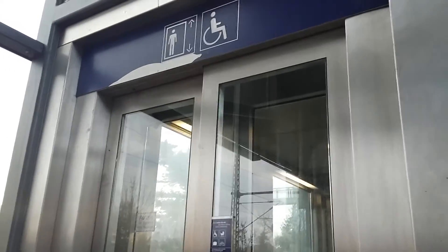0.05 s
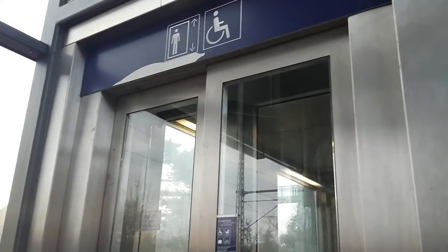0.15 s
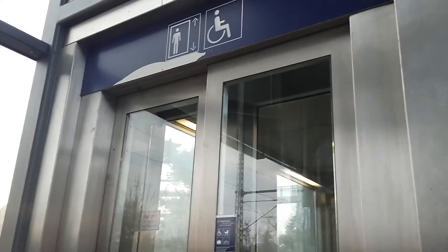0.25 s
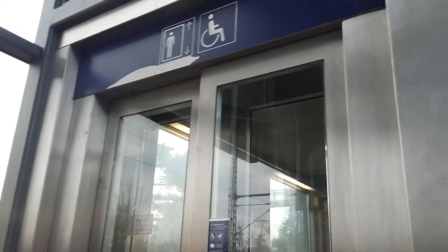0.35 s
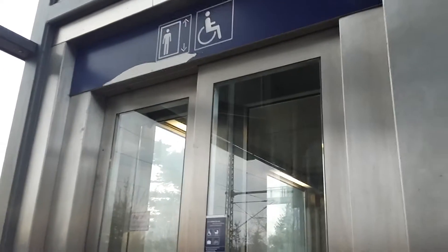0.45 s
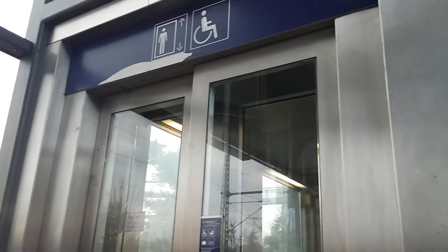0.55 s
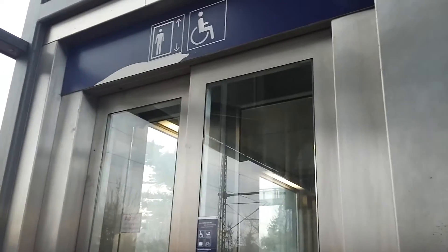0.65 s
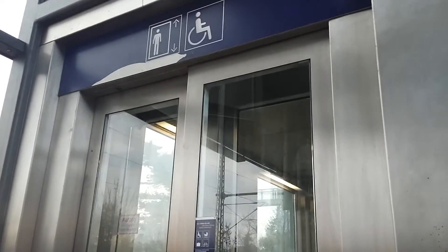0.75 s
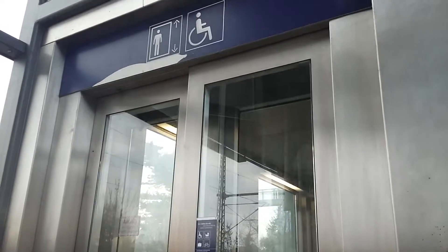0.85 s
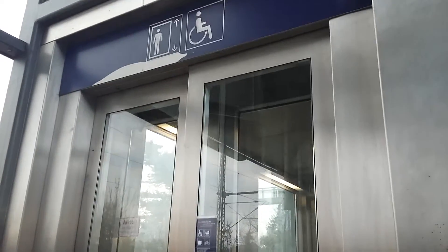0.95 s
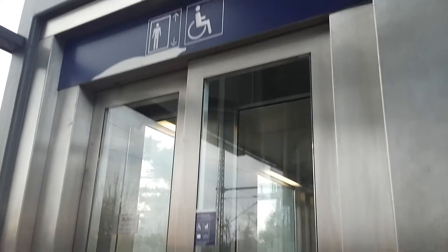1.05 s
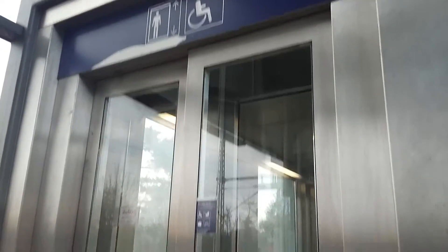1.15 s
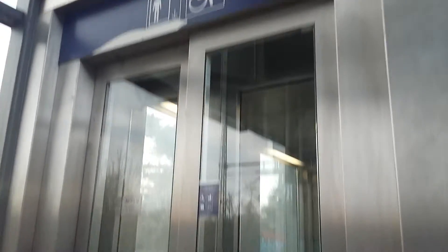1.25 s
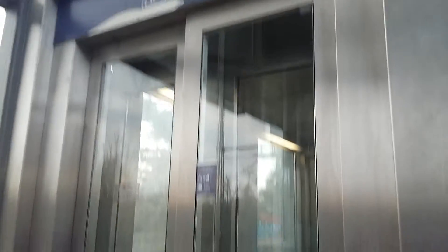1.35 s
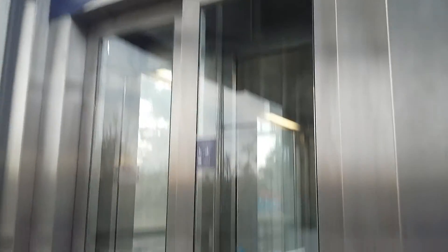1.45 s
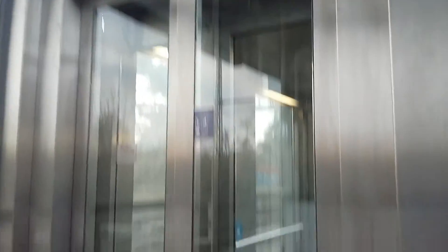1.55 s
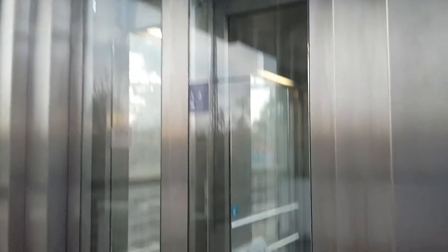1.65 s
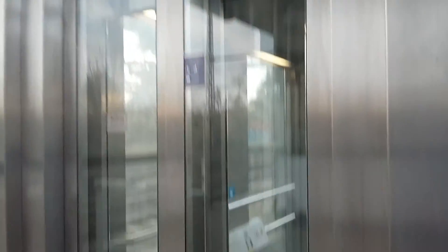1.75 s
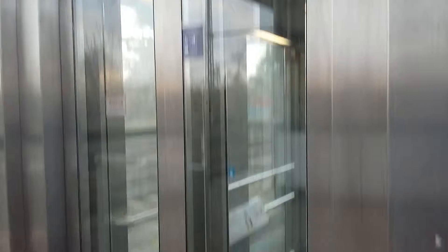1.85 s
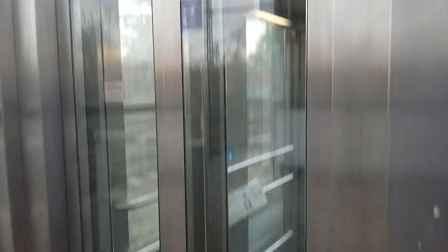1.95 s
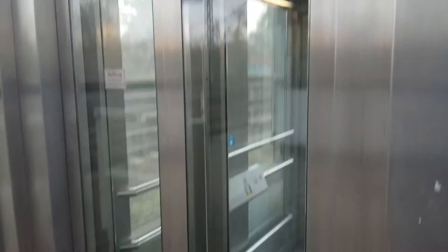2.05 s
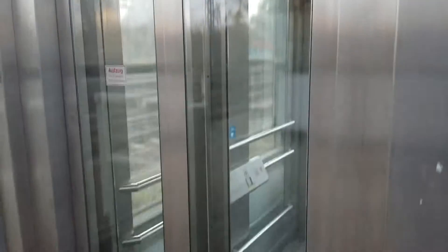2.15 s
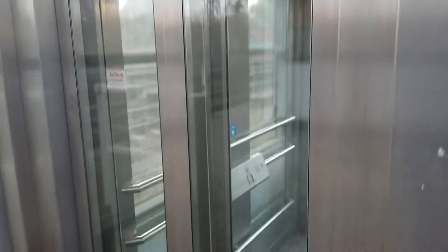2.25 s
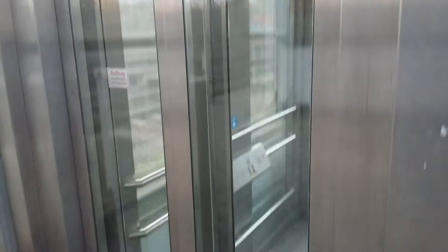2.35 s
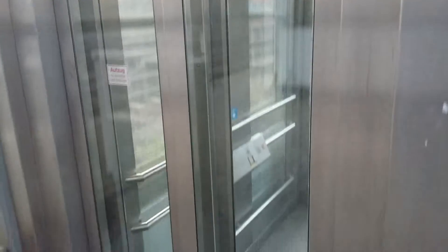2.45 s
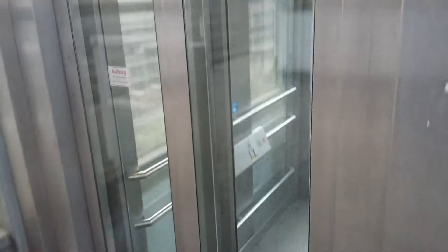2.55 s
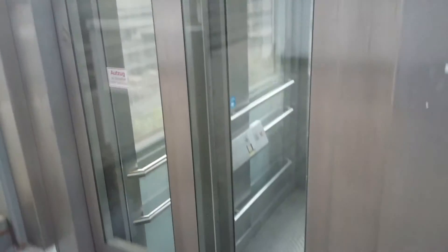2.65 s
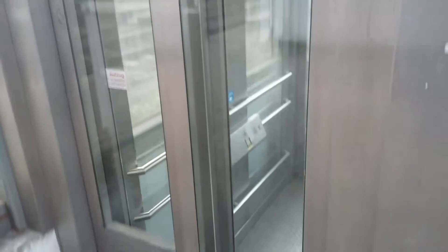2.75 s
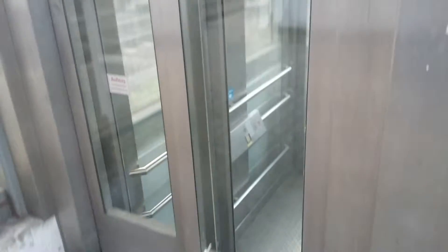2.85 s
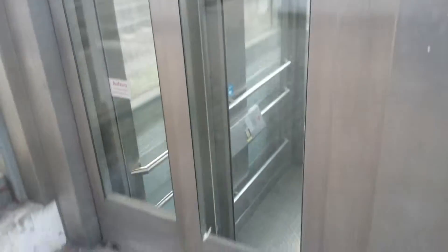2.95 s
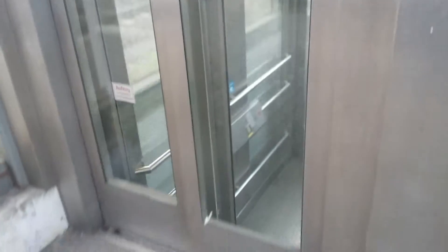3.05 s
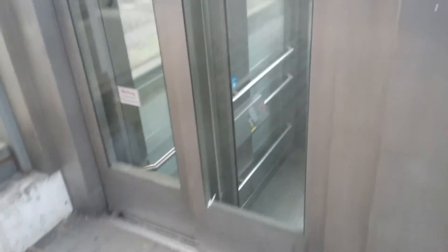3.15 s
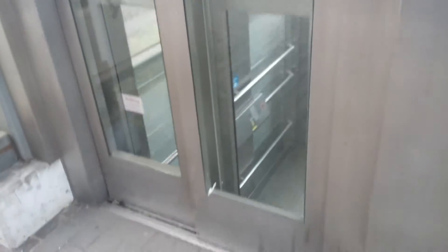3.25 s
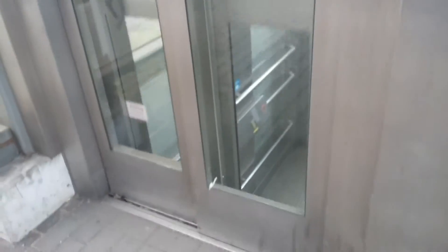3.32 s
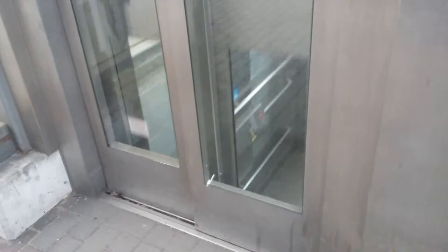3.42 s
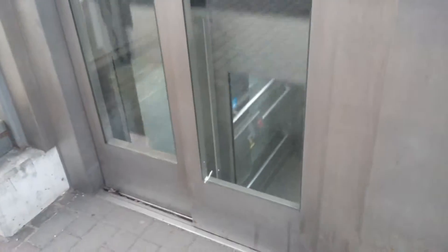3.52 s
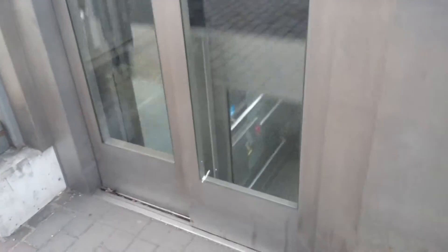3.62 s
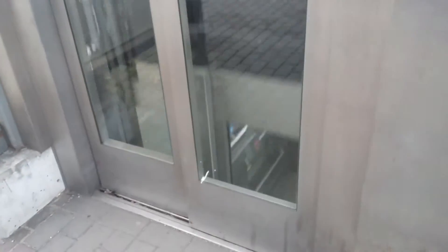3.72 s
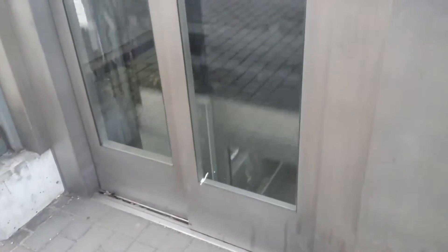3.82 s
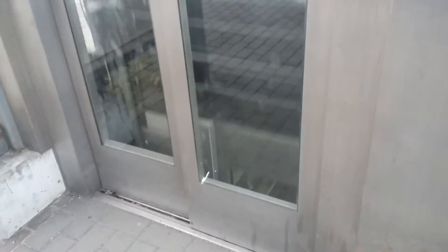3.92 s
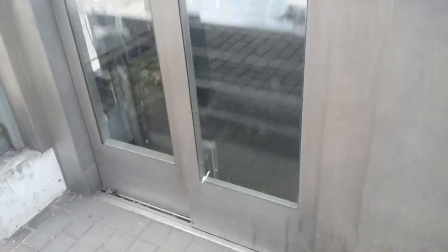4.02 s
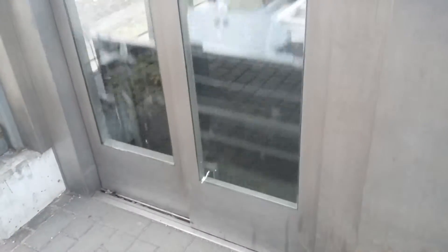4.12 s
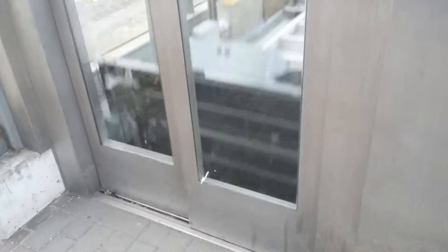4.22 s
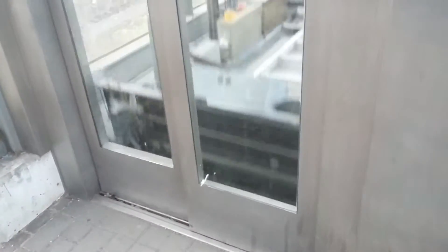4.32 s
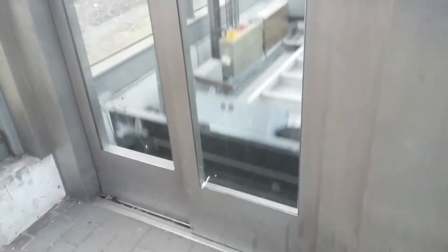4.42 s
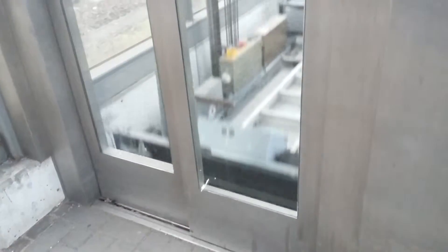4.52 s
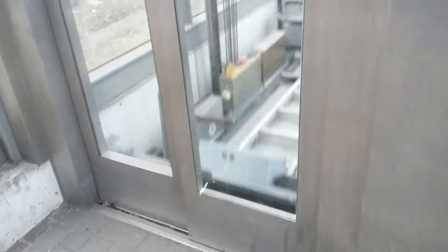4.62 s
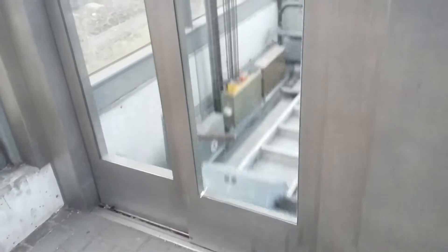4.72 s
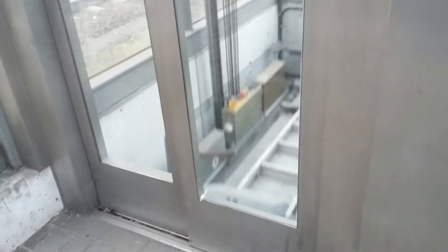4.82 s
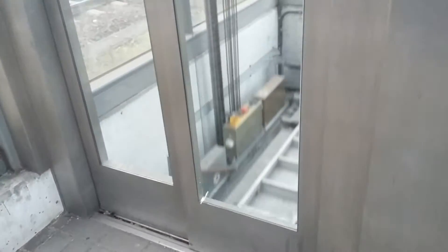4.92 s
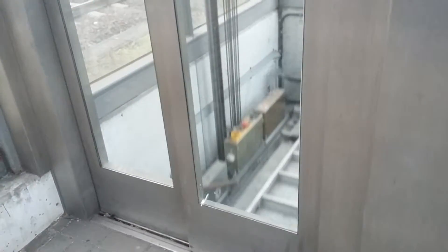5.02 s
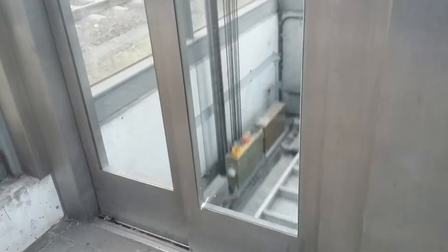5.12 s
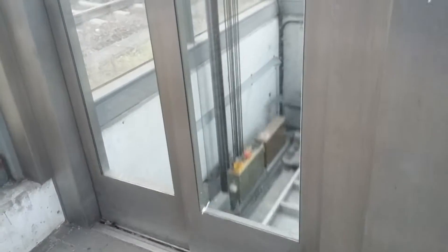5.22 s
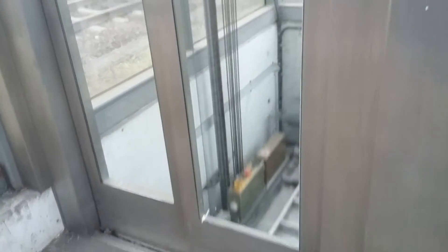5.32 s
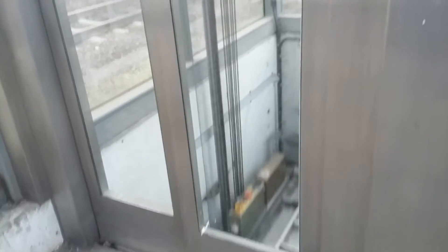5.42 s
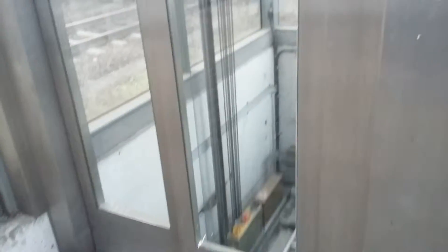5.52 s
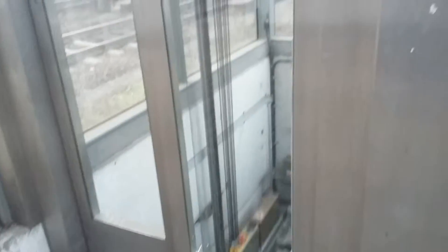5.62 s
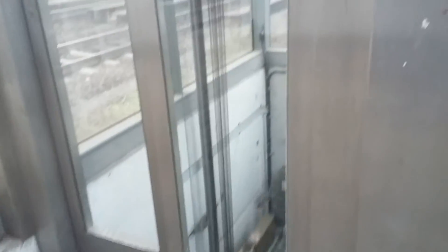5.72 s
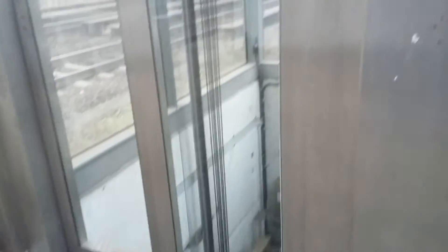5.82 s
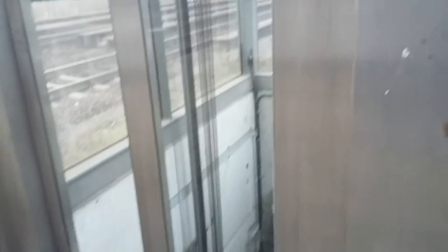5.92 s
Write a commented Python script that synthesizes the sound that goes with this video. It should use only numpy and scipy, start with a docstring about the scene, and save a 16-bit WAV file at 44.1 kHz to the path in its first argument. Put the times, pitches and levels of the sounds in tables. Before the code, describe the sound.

A lift drive groans upward in pitch through a booming shaft, a hard metallic clunk rattles the doors, then a low beating hum carries on.

```python
"""Lift shaft on a railway platform

Outdoors beside a glass lift shaft, which stands a little to the right of a two-port microphone.
The drive's sine orders run up through the booming resonances of the shaft, a latch clunks as ringing
modes while the car passes the landing, and the car travels down on beating low orders and a mains hum.
Thin whines and tiny ticks lie on top; behind are the town, as shaped noise, wind at the ports and hiss.
"""
import sys
import numpy as np
from scipy import signal
from scipy.fft import rfft, irfft, next_fast_len
from scipy.io import wavfile
from scipy.ndimage import uniform_filter1d

SR = 44100
rng = np.random.default_rng(int(sys.argv[2]) if len(sys.argv) > 2 else 0)


def to_wav(sig):
    """Store sig (one row per channel, or 1-D mono) as 16-bit WAV at the path in sys.argv[1].

    Samples outside -1..1 are clipped; the rate is SR.
    """
    pcm = np.clip(np.atleast_2d(sig), -1, 1) * 32767
    pcm = np.round(pcm).astype(np.int16)
    wavfile.write(sys.argv[1], SR, pcm.T)  # frames by channels


N = 263497
T = np.arange(N) / SR


def gain_of(db):
    """Decibels to gain."""
    return 10 ** (np.asarray(db) / 20)


def evened(x):
    """Scaled to rms 1."""
    return x / np.sqrt(np.mean(x ** 2) + 1e-20)


def read(points, hz):
    """A table over frequency, read on a log-frequency axis."""
    f, value = np.transpose(points)
    return np.interp(np.log(hz + 1), np.log(f + 1), value)


def fade(on, off, edge_s):
    """Silent, then held from on to off with straight edges."""
    return np.clip(np.minimum(T - on, off - T) / edge_s, 0, 1)


def curves(rows):
    """Columns over time, and a gate that fades in and out at the ends of the table."""
    s, *columns = np.transpose(rows)
    return fade(s[0], s[-1], .04), [np.interp(T, s, c) for c in columns]


def swell(middle, half):
    """A bell-shaped rise and fall."""
    return np.exp(-((T - middle) / half) ** 2)


def slow(count, span_s):
    """Rows of slow chance, rms 1."""
    size = max(round(span_s * SR), 2)
    chance = rng.standard_normal((N, count)).T
    return evened(uniform_filter1d(uniform_filter1d(chance, size), size))


def tone(hz, db):
    """A sine that follows pitch and rms level curves."""
    return np.sqrt(2) * gain_of(db) * np.sin(2 * np.pi * np.cumsum(hz) / SR)


def resonate(x, hz, width):
    """One resonance of gain 1 at its centre."""
    pole = np.exp((2j * np.pi * hz - np.pi * width) / SR)
    return 2 * signal.lfilter([1 - abs(pole)], [1, -pole], x).real


def clicks(rows):
    """One impulse for each row of start in seconds and level in dB."""
    train = np.zeros(N)
    for s, db in rows:
        train[round(s * SR)] = gain_of(db)
    return train


# Likeness of left and right noise. Each row: frequency in Hz, correlation from -1 to 1.
LIKENESS = [(60, 1), (150, 0.92), (360, 0.95), (870, 0.41), (2130, -0.12), (5190, 0.037)]
# Balance of the noise. Each row: frequency in Hz, left minus right in dB.
BALANCE = [(60, 0), (150, -0.5), (360, -0.5), (870, -0.5), (2130, -3), (5190, 3.5)]


def noise_pair(size, shape_db):
    """Two channels of random short-time spectra; shape_db(hz, t) gives the field of levels."""
    hop = size // 4
    hz = np.fft.rfftfreq(size, 1 / SR)
    t = np.arange(N // hop + 5) * hop / SR
    a, b, c, d = rng.standard_normal((len(t), len(hz), 4)).T
    same = np.clip(read(LIKENESS, hz), -1, 1)[:, None]
    left = a + 1j * b
    right = same * left + np.sqrt(1 - same ** 2) * (c + 1j * d)
    lean_db = read(BALANCE, hz)[:, None] * np.array([.5, -.5])[:, None, None]
    spectra = np.array([left, right]) * gain_of(shape_db(hz[:, None], t) + lean_db)
    return signal.istft(spectra, nperseg=size, noverlap=size - hop)[1][:, :N]


# Air and glass of the shaft. Each row: frequency in Hz, width of the first pass in Hz, level in dB.
SHAFT = [(115.7, 10, 0.5), (184.8, 9.8, -15), (211.3, 15.8, -9.5), (222, 14, -18)]


def shaft(x):
    """The shaft passes on only what meets its resonances."""
    return sum(gain_of(db) * resonate(resonate(x, hz, width), hz, 2 * width) for hz, width, db in SHAFT)


# Drive wheel speeding up, then steady. Each row: time in seconds, turns a second.
WHEEL = [(1.6, 2.77), (1.9, 3.8), (2.2, 4.87), (2.5, 6), (2.8, 6.97), (3.25, 8.33), (3.5, 9.47),
         (3.7, 9.85), (3.87, 10.2), (4.1, 10.26)]
# Orders heard in the run-up, in cycles per turn; their levels in dB; their start and end in seconds.
RUN_UP_ORDERS = (30, 22, 11)
RUN_UP_DB = [-41, -40, -38]
RUN_UP_S = (1.7, 3.25)
RUN_UP_WAVER_DB = 2.5  # chance swing of level, rms
# How well the structure carries each pitch. Each row: frequency in Hz, level in dB.
CARRY = [(55, -23.5), (67, -13.5), (83, -14), (100, -3.5), (109, -1), (118, 1.5), (125, 0.5), (132, -1.5),
         (140, -9), (148, -5), (168, -12), (180, -3.5), (190, 0.5), (197, -11), (205, 1), (210, -5.5),
         (217, 2.5), (224, -10), (232, -19), (240, -13), (250, -9)]
# Rumble that stirs the shaft. Each row: time in seconds, rms level in dB.
STIR = [(0, -39.5), (.9, -50.5), (1.4, -43), (2.3, -44), (2.8, -47.5), (3.15, -41), (3.6, -34.5),
        (4.5, -45.5), (5.3, -46), (5.97, -54)]
# Glass panes that ring on as an order crosses them.
# Each row: frequency in Hz, width of the first pass in Hz, level in dB.
PANES = [(207, 5, 7), (222, 5, 9)]
# the main boom of the shaft, which rings on after an order has crossed it
BOOM_HZ, BOOM_WIDTH_HZ, BOOM_DB = 117.5, 5.2, 15.5


def drive():
    """Three orders sweep upward and the shaft booms as they cross its resonance; rumble stirs it throughout."""
    turns = curves(WHEEL)[1][0]
    orders = 0
    for k, db, waver in zip(RUN_UP_ORDERS, RUN_UP_DB, slow(count=3, span_s=0.033)):
        hz = k * turns
        orders = orders + tone(hz, db + read(CARRY, hz) + RUN_UP_WAVER_DB * waver)
    orders = fade(*RUN_UP_S, 0.045) * orders
    boom = gain_of(BOOM_DB) * resonate(resonate(orders, BOOM_HZ, BOOM_WIDTH_HZ), BOOM_HZ, 45.0)
    rings = sum(gain_of(db) * resonate(resonate(orders, hz, width), hz, 4 * width) for hz, width, db in PANES)
    rumble = evened(shaft(rng.standard_normal(N))) * gain_of(curves(STIR)[1][0])
    return orders + boom + rings + rumble


# Orders of the travelling car, in cycles per turn of the wheel.
TRAVEL_ORDERS = (10, 11, 12, 22)
# Car travelling away. Each row: time in seconds, then the levels of orders 10, 11, 12 and 22 in dB.
TRAVEL_LEVEL = [(3.35, -44, -37, -41, -56), (3.48, -37, -42, -47, -43), (3.58, -34, -38.5, -32.5, -42),
                (3.68, -46, -29.5, -38, -50), (3.77, -46, -29, -47, -52), (3.86, -35.5, -33, -52, -46),
                (3.98, -35, -33, -45, -43.5), (4.08, -40, -36.5, -47, -43), (4.19, -45, -39, -43, -44),
                (4.31, -42, -30.5, -48, -48.5), (4.5, -38.5, -41, -46, -47.5), (4.62, -32, -35, -50, -46.5),
                (4.78, -40, -42, -43, -48), (4.9, -39, -32.5, -52, -58), (5.07, -36.5, -46.5, -54, -62),
                (5.26, -39.5, -50, -42, -57), (5.42, -44, -43, -42, -61), (5.6, -39, -45.5, -40, -65),
                (5.74, -39.5, -52, -41, -49), (5.86, -40, -43, -39, -58), (5.97, -52.5, -56, -49, -57)]
# Balance of those orders: left minus right in dB for each.
ORDER_LEAN_DB = [0, -4.5, -2, -1.5]
# At full speed the orders sit slightly off their exact pitch: offset in Hz for each.
SLIP_HZ = (.4, -.42, .6, -.6)
FULL_SPEED_S = 3.95
WAVER_DB, WAVER_S, WANDER_HZ = 1.2, .05, .12  # chance swing of level, its span, chance drift of pitch
IN_STEP_S = 4.61  # a moment when the orders swell together


def travel():
    """Neighbouring wheel orders beat against each other, each wandering a little in pitch and level."""
    turns = curves(WHEEL)[1][0]
    levels = np.array(curves(TRAVEL_LEVEL)[1]) + WAVER_DB * slow(count=4, span_s=WAVER_S)
    wander_hz = WANDER_HZ * slow(count=4, span_s=0.17)
    pitch_hz = np.outer(TRAVEL_ORDERS, turns) + np.outer(SLIP_HZ, T > FULL_SPEED_S)
    cycles = np.cumsum(pitch_hz + wander_hz, 1) / SR
    cycles = cycles - cycles[:, [round(IN_STEP_S * SR)]]
    orders = 0
    for c, db, lean_db in zip(cycles, levels, ORDER_LEAN_DB):
        sides_db = lean_db * np.array([[.5], [-.5]])
        orders = orders + np.sqrt(2) * np.cos(2 * np.pi * c) * gain_of(db + sides_db)
    return fade(TRAVEL_LEVEL[0][0], 7, 0.086) * orders


# Blows inside the clunk. Each row: start in seconds, level in dB relative to the others,
# place along the latch bar from 0 to 1, softness in ms.
BLOWS = [(3.2133, 8, 0.05, .15), (3.219, 6, 0.36, .05), (3.223, -1.5, 0.9, .06), (3.228, 7, .23, 0.065),
         (3.236, 0, .64, .08), (3.243, 3, .45, .09), (3.248, 2, .91, .09), (3.255, -3, 0.1, .09),
         (3.263, -6.5, 0.73, .09)]
# Modes of the latch. Each row: frequency in Hz, relative level in dB, time to fall 60 dB in seconds.
LATCH = [(366, -11.5, 0.44), (407, -16, 0.23), (437, -5, 0.25), (467, -17.5, 0.35), (524, -8, 0.44),
         (564, -11, 0.33), (617, -5, 0.14), (650, -14.5, 0.25), (691, -6, 0.21), (756, -7, 0.19),
         (802, -2, 0.13), (1006, -8, 0.17), (1155, -20.5, 0.67), (1360, -32, 0.24), (1430, -23, .28),
         (1430, -22, 0.3), (1584, -11, 0.2), (1630, -10, 0.13), (1880, -16, 0.14), (1920, -23, 0.28),
         (2096, -18, 0.2), (2950, -26, .15), (3340, -26, 0.11), (2148, -9.5, .16), (2180, -12, .18),
         (2420, -20, .14), (3080, -20, .08)]
# Colour of the door rattle. Each row: frequency in Hz, relative level in dB per Hz.
RATTLE = [(35, -42), (60, -11), (136, 7), (338, -15.5), (450, -5.5), (576, -18), (752, -10.5), (827, -14.5),
          (1250, -18.5), (1640, -16.5), (1770, -17.5), (2250, -25.5), (2550, -32.5), (3000, -31.5),
          (5640, -49.5), (7330, -61), (12400, -120)]
# Decay of the rattle. Each row: frequency in Hz, time to fall 60 dB in seconds.
RATTLE_T60 = [(100, 0.5), (170, 0.6), (300, 0.6), (500, 0.5), (1500, 0.45), (4000, 0.55), (8000, 1)]
# Onset of the rattle. Each row: frequency in Hz, seconds to full strength.
RATTLE_RISE_S = [(100, 0.017), (400, 0.013), (800, .002), (1600, 0.028), (2300, .006), (5000, .004)]
# Modes of the frame. Each row: frequency in Hz, delay after the first blow in seconds, level in dB,
# rise in seconds, time to fall 60 dB in seconds.
FRAME = [(59.7, .056, -19.5, 0.049, 1), (111.7, 0.036, -20.5, 0.026, 0.71), (134, 0.039, -22, 0.025, 0.84),
         (153.6, 0.064, -29.5, 0.055, 1), (167, 0.016, -27.5, 0.034, 0.79), (182, .02, -37.5, 0.027, 0.43),
         (213, 0.022, -36, 0.025, 0.61), (274.6, 0.0052, -26, 0.033, 0.48),
         (297, 0.015, -25.5, 0.039, 0.41), (440, .008, -24, .012, 0.27), (635, .015, -27, .012, .2),
         (767, .001, -22, 0.0083, .2), (1588, .006, -32.5, 0.0045, .25), (1657, .008, -37.5, 0.0057, 0.16)]


def clunk():
    """A cluster of blows rings the latch, sets the doors rattling and swells the frame."""
    t, latch = np.arange(SR) / SR, 0
    hz, db, t60 = np.transpose(LATCH)[:, :, None]
    modes = gain_of(db - 60 * t / t60) * np.sin(2 * np.pi * hz * t)
    for *blow, place, soft_ms in BLOWS:
        # where it lands decides how each mode is pushed
        spot = np.cos(np.pi * place * np.arange(len(LATCH)))
        # rubber buffers soften each blow
        pad = np.exp(-(np.arange(-40, 41) / (soft_ms * SR / 1000)) ** 2)
        padded = signal.oaconvolve(clicks([blow]), pad / pad.sum(), "same")
        latch = latch + gain_of(-33.0) * signal.oaconvolve(padded, spot @ modes)[:N]
    start = BLOWS[0][0]

    def rattle_db(hz, s):
        rise = np.clip((s - start) / read(RATTLE_RISE_S, hz), .2, 1)
        fall_db = 60 * np.maximum(s - start - .03, 0) / read(RATTLE_T60, hz)
        return read(RATTLE, hz) + 20 * np.log10(rise) - fall_db

    onset = np.clip((T - start) / 0.0018, 0, 1)
    rattle = gain_of(-42.5) * evened(noise_pair(512, rattle_db) * onset)
    booms = 0
    for hz, delay, db, rise, t60 in FRAME:
        age = np.maximum(T - start - delay, 0)
        booms = booms + (1 - np.exp(-age / rise)) ** 2 * tone(hz + 0 * T, db - 60 * age / t60)
    return latch + booms, rattle


# Mains hum of the drive. Each row: time in seconds, level in dB, level of its octave in dB.
MAINS = [(2.12, -50, -73), (2.3, -49.5, -75), (2.75, -44, -69), (2.95, -51, -61), (3.15, -56, -66),
         (3.4, -47, -59.5), (3.94, -52, -57.5), (4.12, -46, -56.5), (6.1, -44.5, -57.5)]
MAINS_HZ = 300.2
# Short hums of the shaft. Each row: middle in seconds, length in seconds, frequency in Hz,
# glide in Hz per second, peak level in dB.
HUMS = [(0.189, 0.51, 100.1, 20, -41), (0.386, 0.16, 121, 0.5, -37.5), (2.838, 0.59, 117.4, -7.5, -44.5)]


def hums():
    """Steady sines give the mains hum and its octave; gliding sines under bell curves give the short hums."""
    gate, (db, octave_db) = curves(MAINS)
    mains = gate * (tone(MAINS_HZ + 0 * T, db) + tone(2 * MAINS_HZ + 0 * T, octave_db))
    short = sum(swell(s, length / 2) * tone(hz + glide * (T - s), peak_db)
                for s, length, hz, glide, peak_db in HUMS)
    return mains + short


# Thin whines. Each row: start in seconds, end in seconds, fade in seconds, frequency in Hz,
# width of each of three passes in Hz, rms level in dB.
WHINES = [(.9, 1.04, .03, 7150, 60, -77), (2.3, 7, 1.1, 7850, 150, -85), (2.3, 7, 1.1, 8000, 700, -83),
          (-1, 5, 1.5, 4230, 250, -68), (3.6, 7, 1.1, 3150, 300, -74), (3, 6.3, .6, 3095, 30, -71.5),
          (3.3, 6.3, .5, 3208, 25, -71.5), (3.3, 6.2, .5, 1174, 25, -62.5)]
# Faint thin high tones. Each row: start in seconds, end in seconds, frequency in Hz, level in dB.
HIGH_TONES = [(-1, 1.4, 8000, -93), (.05, 1.5, 6799, -93), (.22, 1.3, 6896, -96), (1, 1.35, 6498, -94)]
HIGH_TONE_WAVER_DB = 1.5  # chance swing of level, rms


def whines():
    """Narrow bands of noise, separate at each port, and the wavering high tones."""
    out = sum(fade(on, off, .12) * tone(hz + 0 * T, db + HIGH_TONE_WAVER_DB * waver)
              for (on, off, hz, db), waver in zip(HIGH_TONES, slow(count=4, span_s=0.047)))
    for on, off, edge_s, hz, width, db in WHINES:
        band = rng.standard_normal((2, N + SR))  # a second to settle
        for _ in range(3):
            band = resonate(band, hz, width)
        out = out + gain_of(db) * fade(on, off, edge_s) * evened(band[:, SR:])
    return out


# Small ticks. Each row: start in seconds, level in dB.
TICKS = [(2.5395, -46), (2.543, -46), (2.5455, -58)]


def ticks():
    """Bright snaps close to the microphone: a burst of noise and a short ring, pitched apart at the ports."""
    t = np.arange(300) / SR
    snap = 0.26 * np.diff(rng.standard_normal((301, 2)).T) * np.exp(-t / 0.00038)
    ring = np.sin(2 * np.pi * np.array([[5300], [5700]]) * t) * t / 0.00019 * np.exp(-t / 0.00044)
    return signal.oaconvolve(clicks(TICKS)[None], snap + ring, axes=1)[:, :N]


# Colour of the town wash. Each row: frequency in Hz, relative level in dB per Hz.
WASH = [(35, -46.5), (60, 0.5), (80, -16), (100, -1.5), (160, -9), (240, -11), (340, -12.5), (620, -18.5),
        (1100, -19), (1900, -19), (2200, -21), (2420, -22.5), (2560, -25), (3700, -32), (4800, -35.5),
        (5150, -44), (7300, -64.5)]
# The top of the wash shifts as the microphone turns. Each row: time in seconds, dB gained
# in full above 5.5 kHz.
BRIGHT = [(0, 2), (.7, -1), (1.3, 1), (2, 4), (4.5, 1.5), (5.7, 4)]
WASH_DB, WASH_FADE_DB_PER_S = -41, -0.1879  # the town, a little louder at first
# Road noise that fades as the traffic leaves. Each row: time in seconds, rms level in dB.
ROAD = [(0, -47.5), (1.2, -51.5), (2.3, -52), (3, -58.5), (4, -61)]
ROAD_HZ, ROAD_WIDTH_HZ = 884, 550


def town():
    """Distant traffic and air: smooth noise with faint drifting patches, and the fading road band."""
    def wash_db(hz, t):
        chance = rng.standard_normal((len(t), len(hz))).T
        patches = uniform_filter1d(uniform_filter1d(chance, 30, 0), 6, 1)
        bright_db = np.interp(t, *np.transpose(BRIGHT)) * np.clip((hz - 4500) / 1000, 0, 1)
        return read(WASH, hz) + bright_db + evened(patches)  # patches of 1 dB rms

    def road_db(hz, t):
        return -60 * np.tanh(0.19 * ((hz - ROAD_HZ) / ROAD_WIDTH_HZ) ** 2) + 0 * t

    wash = gain_of(WASH_DB + WASH_FADE_DB_PER_S * T) * evened(noise_pair(2048, wash_db))
    road = gain_of(curves(ROAD)[1][0]) * evened(noise_pair(1024, road_db))
    return wash + road


# Colour of the wind at the ports. Each row: frequency in Hz, relative level in dB.
WIND_COLOUR = [(25, -28.5), (55, 2.5), (90, -1.5), (200, -12.5), (320, -32.5), (600, -53), (2000, -100)]
# Gusts. Each row: middle in seconds, half length in seconds, level in dB.
GUSTS = [(2.57, .06, -45), (5.39, 0.085, -39)]
BREEZE_DB, BREEZE_DB_PER_S = -68.5, 4.5  # level at the start, and how it freshens
HISS_DB = -84.5  # self-noise of the microphone


def wind():
    """Lumpy low noise, unrelated at the two ports, and the faint even hiss."""
    size = next_fast_len(N)
    colour = gain_of(read(WIND_COLOUR, np.fft.rfftfreq(size, 1 / SR)))
    air = irfft(rfft(rng.standard_normal((2, size))) * colour, size)
    gusts = sum(gain_of(db) * swell(s, half) for s, half, db in GUSTS)
    strength = gain_of(BREEZE_DB + BREEZE_DB_PER_S * T) + gusts
    return strength * evened(air[:, :N]) + gain_of(HISS_DB) * rng.standard_normal((2, N))


def scene():
    """The lift a little to the right, within the town, the wind and the small sounds."""
    struck, rattle = clunk()
    lift = drive() + hums() + struck
    late = np.pad(lift, (round(.00012 * SR), 0))[:N]  # the left port is a little farther from the shaft
    placed = np.array([late, lift]) * gain_of([[-.9], [.9]])
    return placed + travel() + rattle + town() + wind() + whines() + ticks()


def record(dry):
    """The microphone loses the deepest bass; then a steep filter limits the band at the top."""
    thin = signal.sosfilt(signal.butter(4, 48, "highpass", fs=SR, output="sos"), dry)
    held = np.pad(thin, ((0, 0), (255, 255)), "reflect", reflect_type="odd")
    band_limit = signal.firwin(511, 15700, window=("kaiser", 9), fs=SR)  # edge in Hz
    return signal.oaconvolve(held, band_limit[None], "valid", axes=1)


dry = scene()
out = record(dry)
to_wav(out)
```